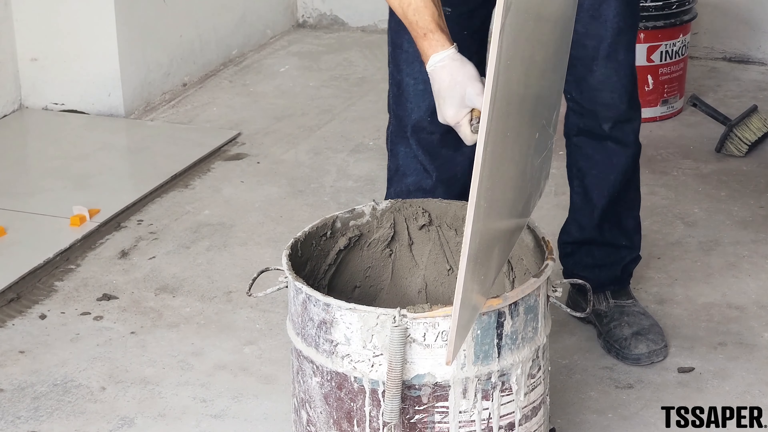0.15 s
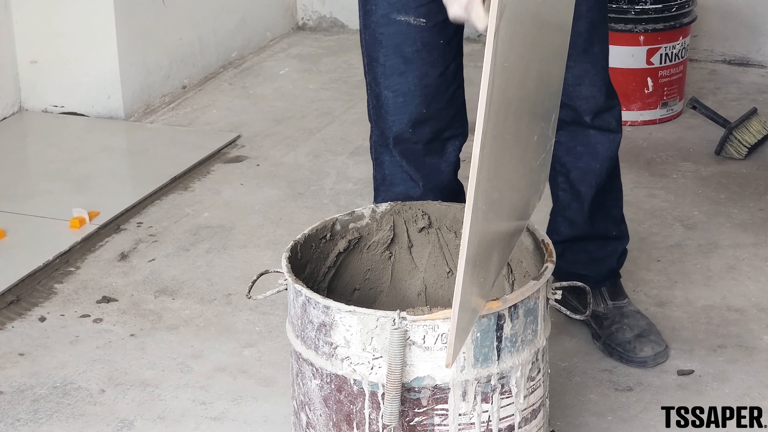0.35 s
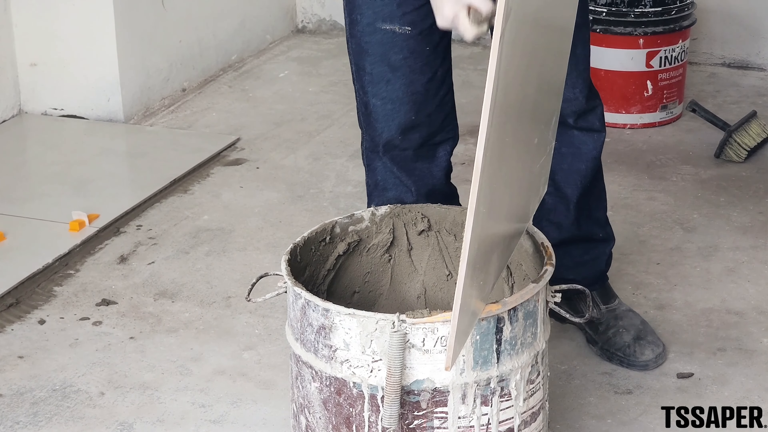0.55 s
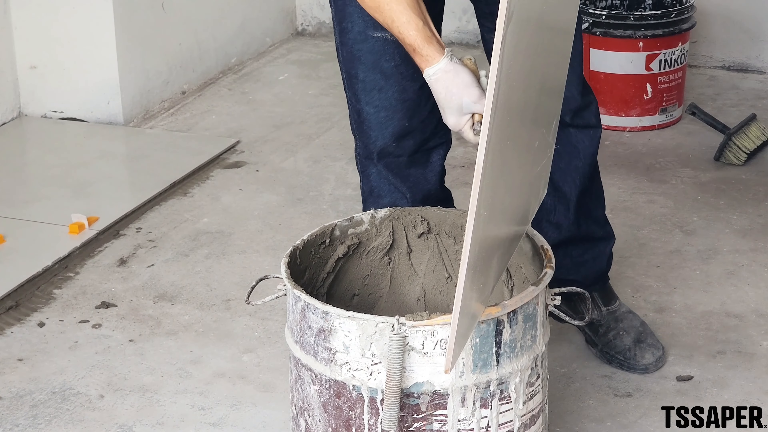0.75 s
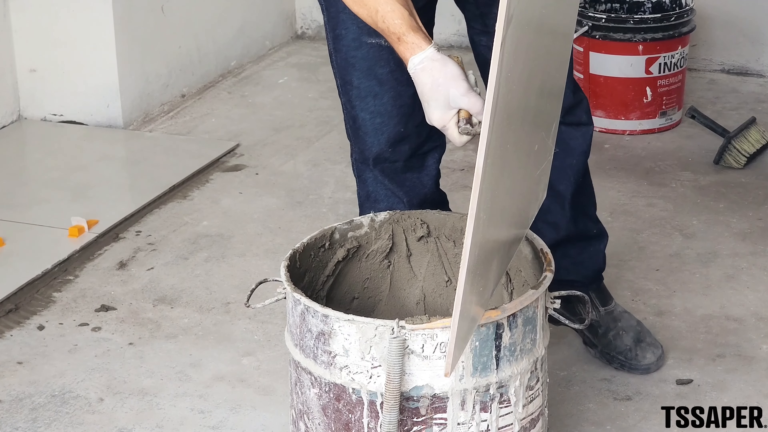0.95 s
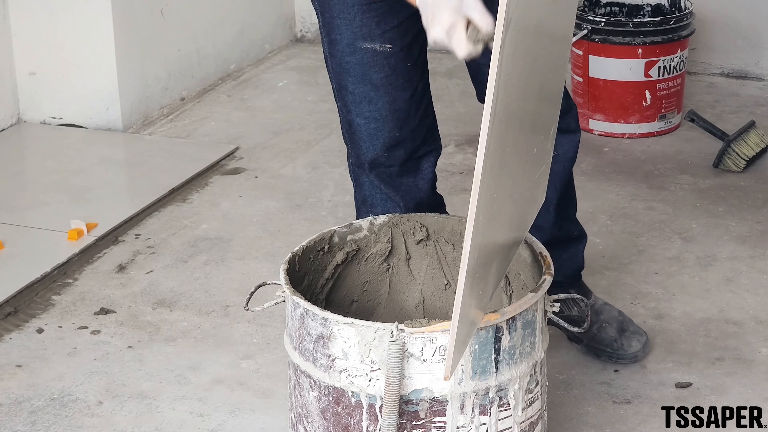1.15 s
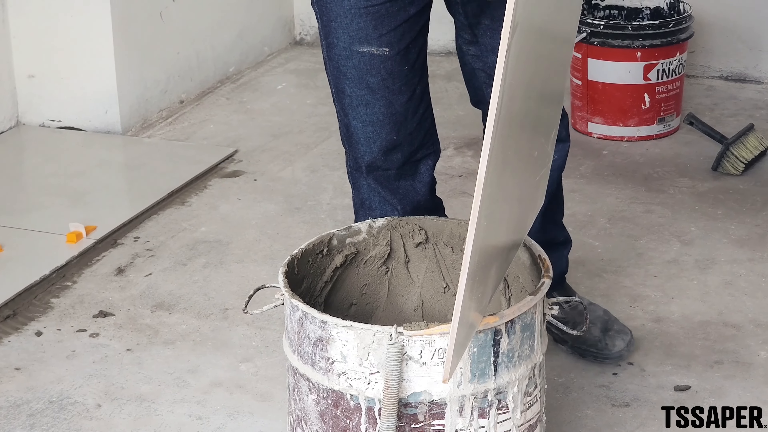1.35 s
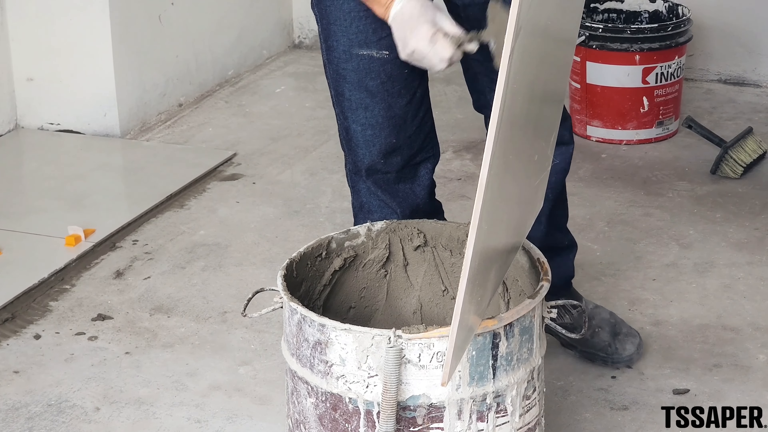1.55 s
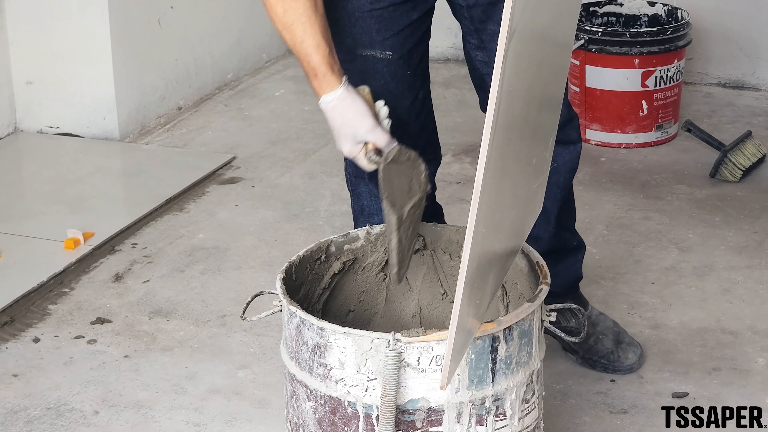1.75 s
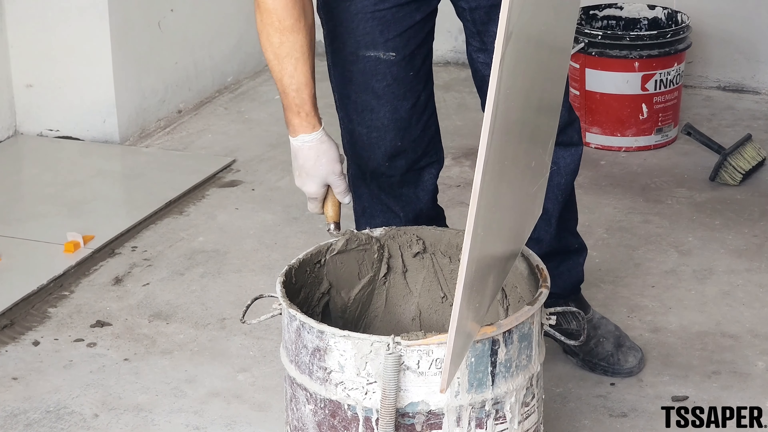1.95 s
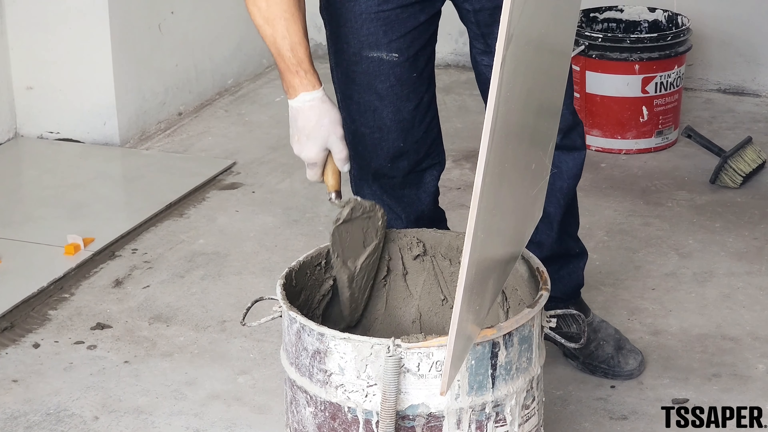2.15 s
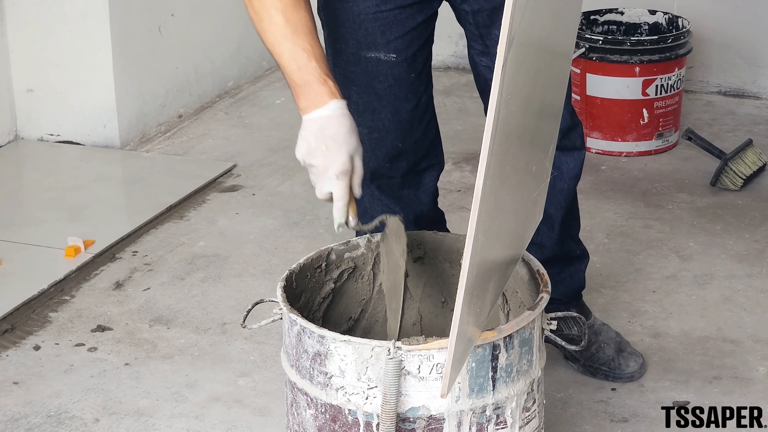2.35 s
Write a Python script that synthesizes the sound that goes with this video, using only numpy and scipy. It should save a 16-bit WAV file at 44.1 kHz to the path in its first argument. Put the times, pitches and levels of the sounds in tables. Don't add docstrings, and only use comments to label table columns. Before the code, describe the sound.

Short gritty trowel scrapes on a hard tile, then a knock on a hollow bucket and wet slide

```python
import sys
import numpy as np
from scipy import signal
from scipy.fft import rfft, irfft, next_fast_len
from scipy.io import wavfile
from scipy.ndimage import uniform_filter1d, map_coordinates

SR = 44100
rng = np.random.default_rng(int(sys.argv[2]) if len(sys.argv) > 2 else 0)


def invert_db(level):
    return 10 ** (np.asarray(level, dtype=float) / 20)


def transcribe(signal):
    frames = np.atleast_2d(signal).T
    limited = np.clip(frames, -1, 1)
    pcm = np.round(limited * 32767).astype(np.int16)
    wavfile.write(sys.argv[1], SR, pcm)


N = 105840

# time_s, pressure_db, ring_over_grit_db
STROKES = [
    [(.283, -60, 16), (.293, -50, 10), (.318, -38.5, 12.5), (.356, -36, 10.5), (.43, -41, 13.5),
     (.45, -36.5, 8.5), (.5, -37, 11.5), (.535, -55, 15), (.6, -60, -6)],
    [(.818, -46, 7), (.826, -39, 6), (.872, -44, 12), (.915, -49.5, 15.5), (.945, -38.5, 13),
     (.995, -40.5, 12), (1.035, -40, 12), (1.06, -52.5, 12.5), (1.2, -49.5, 12.5)],
    [(1.221, -74, 9), (1.225, -37, 10), (1.245, -48, 13), (1.29, -56.5, 16.5), (1.36, -64, 14)],
    [(1.378, -50, 10), (1.386, -37.5, 12.5), (1.4, -40, 12.5), (1.425, -37.5, 5.5), (1.47, -33.5, 7.5),
     (1.5, -42.5, 16), (1.56, -66, 10), (1.63, -71, -2)],
]
# start_s, peak_db, pitch_hz, t60_s
CATCHES = [(.291, -30, 1084, 0.012), (.3148, -18, 1850, .012), (.345, -10, 1800, .012),
           (.3557, -13.5, 1782, 0.057), (.362, -17, 2500, 0.016), (.3762, -6, 1740, 0.0096),
           (.389, -17, 1900, 0.027), (.402, -9, 1883, 0.025), (.41, -10, 1960, .015),
           (.4272, -8.5, 1670, 0.011), (.436, -23, 1840, .012), (.465, -14, 1800, .012),
           (.477, -20, 2160, 0.0077), (.5, -35, 2300, 0.017), (.5225, -12, 1500, 0.0041),
           (.531, -24, 1730, 0.0073), (.8383, -18.5, 1650, 0.022), (.8727, -8.5, 1830, 0.014),
           (.895, -35, 1790, 0.013), (.9535, -13, 2240, .014), (.96, -17, 3500, 0.01),
           (.969, -15, 2140, 0.0071), (.98, -23, 1840, 0.031), (.99, -12, 1830, 0.021),
           (.997, -22, 1770, 0.011), (1.003, -13, 1880, 0.019), (1.01, -19, 2300, 0.0073),
           (1.022, -12.5, 1600, 0.011), (1.039, -19, 1770, 0.0097), (1.055, -18, 1900, 0.0088),
           (1.07, -30, 1800, 0.01), (1.173, -15.5, 1736, 0.018), (1.198, -16, 1730, .015),
           (1.2245, -31, 4160, .008), (1.227, -11, 2860, 0.011), (1.229, -16.5, 3280, 0.011),
           (1.236, -23, 1353, 0.073), (1.2725, -24.5, 1550, 0.079), (1.3893, -9, 1690, .016),
           (1.3983, -10, 1677, .05), (1.4, -15.5, 2116, 0.046), (1.4257, -15, 1604, 0.031),
           (1.435, -9, 1800, .012), (1.455, -15, 1720, 0.016), (1.462, -11, 1740, 0.029),
           (1.471, -9.5, 2190, 0.01), (1.49, -15, 1800, 0.0097), (1.518, -14.5, 1900, 0.018),
           (1.567, -20, 1880, 0.012)]
# centre_hz, width_hz, level_db
TILE_MODES = [(212, 13, -10), (306, 36, -11), (650, 62, -10), (876, 35, 1.5), (1050, 60, -5),
              (1342, 60, 4.5), (1620, 44, 4), (1657, 57, 2.5), (1750, 105, 2), (1835, 72, 6.5),
              (1905, 34, -2), (1965, 36, 7.5), (2263, 280, -4.5), (2488, 81, 4)]
# freq_hz, level_db
TILE_BODY = [(200, -55), (450, -10.5), (650, -4), (1100, -6), (1800, 1.5), (2600, -3.5), (3600, -16),
             (6000, -49)]
# freq_hz, density_db_per_hz
GRIT = [(800, -43.5), (2000, -26.5), (3600, -9), (5500, -14), (7500, -15.5), (9500, -24), (12500, -19.5),
        (16000, -28.5)]
# start_s, peak_db
KNOCKS = [
    (1.9762, -21.5),
    (1.9773, -14),
]
# time_s, blade_db, boom_db
DRAG = [
    (1.973, -38, -58),
    (1.977, -41.5, -37),
    (2.0, -41.5, -36.5),
    (2.035, -41, -41),
    (2.055, -61, -38),
    (2.11, -64, -38),
    (2.13, -62, -47),
    (2.22, -80, -55),
    (2.3, -81, -70),
]
# start_s, peak_db, pitch_hz, t60_s
JOLTS = [
    (1.976, -25, 356, 0.067),
    (1.99, -24, 157, 0.091),
    (2.013, -27, 330, 0.13),
    (2.042, -26, 214, 0.081),
    (2.05, -26, 285, 0.091),
    (2.1, -22.5, 278, 0.099),
    (2.2, -32, 292, .08),
]
# time_s, level_db
SLIDE = [
    (2.175, -53),
    (2.2, -44.5),
    (2.25, -50),
    (2.32, -46.5),
    (2.4, -51),
]
# centre_hz, width_hz, level_db
BUCKET_MODES = [(151, 53, -1.5), (218, 65, -4), (285, 97, 5.5), (376, 110, -1.5), (642, 85, -10.5)]
# centre_hz, width_hz, level_db
BLADE_MODES = [(790, 830, -0.5), (1440, 340, -1), (2300, 670, 4), (2950, 540, 1.5), (3900, 440, -15),
               (4850, 370, 1.5), (5430, 520, 3), (6500, 400, -9), (7540, 780, -5.5), (8800, 600, -14),
               (11600, 1900, -5.5)]
# centre_hz, width_hz, level_db
MORTAR_MODES = [(1300, 190, -2), (2000, 750, 0.5), (4540, 610, 2.5), (6300, 3000, -19.5),
                (9900, 2600, -11.5)]
# centre_hz, width_hz, level_db
EARLIER_MODES = [(686, 54, -8.5), (1360, 90, -5), (1620, 77, -9), (1710, 31, -4), (1844, 40, 2.5),
                 (1980, 120, -4.5), (2500, 200, -11.5)]
# freq_hz, t60_s
ROOM_T60 = [(200, 0.93), (800, 0.82), (2000, 0.64), (5000, 0.55), (10000, 0.45), (15000, 0.24)]
# time_s, low_hum_db, upper_hum_db
HUM = [(0.0, -38.5, -41), (0.31, -49, -37.5), (0.37, -43, -31), (0.45, -35.5, -39), (0.75, -43, -48),
       (0.93, -79, -39.5), (1.0, -63, -38.5), (1.27, -46.5, -55), (1.47, -62, -42.5), (1.57, -65, -46),
       (1.86, -50, -38), (2.14, -69, -53), (2.29, -64, -43), (2.4, -53, -67)]
# freq_hz, density_db_per_hz
MURMUR = [(90, -4.5), (130, -2.5), (220, -9.5), (450, -17.5), (1100, -26), (1900, -24), (7000, -38.5),
          (13000, -55)]
# freq_hz, likeness_0_to_1
ALIKE = [(60, 1), (200, 0.93), (380, 0.75), (700, 0.1), (1300, 0.016), (5000, 0.011)]
# freq_hz, left_over_right_db
LEFT_OVER_RIGHT = [(60, 1), (130, -2), (290, 0), (640, 1), (1410, -7), (3100, -6.5), (6820, -1.5),
                   (15000, -5)]
# freq_hz, side_db
NARROW = [(5500, 0), (7500, -7.5), (11000, -8), (15000, -14)]


def unit(x):
    return x / np.sqrt(np.mean(x ** 2) + 1e-20)


def along(points, hz):
    f, v = np.transpose(points)
    return np.interp(np.log(hz + 1), np.log(f + 1), v)


def curves(rows, outside=-120):
    s, *cols = np.transpose(rows)
    return [np.interp(np.arange(N) / SR, s, c, outside, outside) for c in cols]


def wobble(rate_hz):
    knots = rng.standard_normal(int(N * rate_hz / SR) + 4)
    return map_coordinates(knots, [np.arange(N) * rate_hz / SR])


def filtered(x, response):
    m = next_fast_len(N + SR // 2)
    return irfft(rfft(x, m) * response(np.fft.rfftfreq(m, 1 / SR)), m)[..., :N]


def modes(peaks):
    def response(f):
        total = 0
        for k, (c, w, db) in enumerate(peaks):
            total = total + (-1) ** k * invert_db(db) * 1j * f * w / (c * c - f * f + 1j * f * w)
        return total
    return response


def blend(peaks):
    return lambda f: np.sqrt(sum(np.abs(modes([peak])(f)) ** 2 for peak in peaks))


def colour(points):
    return lambda hz: invert_db(along(points, hz))


def pair(a, b):
    def turn(hz):
        angle = np.arccos(np.clip(along(ALIKE, hz), -1, 1)) / 2
        return np.array([np.cos(angle), np.sin(angle)])
    mid, side = filtered(np.array([a, b]), turn)
    return np.array([mid + side, mid - side])


def slips(slips_per_s, hiss_share):
    spread_db, clump_db = 3, 2.5
    happens = rng.random(N) < slips_per_s / SR
    size = np.minimum(rng.exponential(size=N), 3)
    grains = happens * np.sign(rng.standard_normal(N)) * invert_db(spread_db * size)
    hiss = rng.standard_normal(N)
    mix = np.sqrt(1 - hiss_share) * unit(grains) + np.sqrt(hiss_share) * hiss
    return unit(invert_db(clump_db * wobble(69.59)) * mix)


def patchy(x, depth_db):
    z = signal.stft(x, nperseg=256)[2]
    field = uniform_filter1d(rng.standard_normal(z.shape), size=5, axis=0)
    field = uniform_filter1d(field, size=8, axis=1)
    return signal.istft(z * invert_db(depth_db * unit(field)), nperseg=256)[1][:N]


def pings(rows, rise_s, grit):
    t, noise = np.arange(N) / SR, grit * rng.standard_normal(N)
    total = np.zeros(N)
    for start_s, db, hz, t60_s in rows:
        age = np.maximum(t - start_s, 0)
        envelope = invert_db(db - 60 * age / t60_s) * (1 - np.exp(-age / rise_s))
        total += envelope * (np.sin(2 * np.pi * hz * age) + noise)
    return total


def tile():
    body_db, body_at_db, body_growth = -4.5, -39.5, 0.17
    force = slips(slips_per_s=2100, hiss_share=0.37)
    press = sum(invert_db(curves(rows)[0]) for rows in STROKES)
    rung = sum(invert_db(np.sum(curves(rows), axis=0)) for rows in STROKES)

    treble = filtered(force, lambda hz: colour(GRIT)(hz) * (hz > 7000))
    grit = patchy(filtered(force * press, colour(GRIT)), depth_db=3.5) / np.sqrt(np.mean(treble ** 2))

    ring = filtered(force * rung, modes(TILE_MODES)) / np.std(filtered(force, modes(TILE_MODES)))
    swell = invert_db(body_db) * (press / invert_db(body_at_db)) ** body_growth
    body = filtered(force * rung * swell, colour(TILE_BODY)) / np.std(filtered(force, colour(TILE_BODY)))
    return grit + ring + body + pings(CATCHES, rise_s=0.00064, grit=0.038)


def bucket():
    crack_t60_s, thump_db = 0.009, 25.5
    t = np.arange(N) / SR
    cracks, blows = np.zeros(N), np.zeros(N)
    for start_s, db in KNOCKS:
        cracks += invert_db(db - 2.5 - 60 * np.abs(t - start_s) / crack_t60_s) * (t >= start_s)
        blows[round(start_s * SR)] = invert_db(db + thump_db)
    thump = filtered(blows, modes(BUCKET_MODES))

    blade_db, boom_db = curves(DRAG)
    rattle = unit(filtered(slips(slips_per_s=1500, hiss_share=0.82), blend(BLADE_MODES)))
    blade = (invert_db(blade_db) + cracks) * rattle

    force = slips(slips_per_s=270, hiss_share=0.8)
    boom = filtered(force * invert_db(boom_db), modes(BUCKET_MODES)) / np.std(filtered(force, modes(BUCKET_MODES)))
    return blade + boom + thump


def mortar():
    sink_ratio = 0.94
    wet = slips(slips_per_s=3500, hiss_share=0.85)
    shallow = unit(filtered(wet, blend(MORTAR_MODES)))
    deep = unit(filtered(wet, lambda hz: blend(MORTAR_MODES)(hz / sink_ratio)))
    depth = np.interp(np.arange(N) / SR, [SLIDE[0][0], SLIDE[-1][0]], [0, np.pi / 2])
    return invert_db(curves(SLIDE)[0]) * (np.cos(depth) * shallow + np.sin(depth) * deep)


def earlier():
    ring_db, ring_t60_s, grit_db, grit_t60_s, dull_hz = -45, 0.99, -50, 0.52, 4200
    t = np.arange(N) / SR
    ring = unit(filtered(pair(*rng.standard_normal((2, N))), modes(EARLIER_MODES)))
    grit = unit(filtered(pair(*rng.standard_normal((2, N))),
                         lambda hz: colour(GRIT)(hz) / (1 + (hz / dull_hz) ** 2)))
    return invert_db(ring_db - 60 * t / ring_t60_s) * ring + invert_db(grit_db - 60 * t / grit_t60_s) * grit


def room(x):
    first_wall_s, step = 0.004, SR // 8
    wet = np.zeros((2, N + 2 * SR))
    for at in range(0, N, step):
        hz, t, z = signal.stft(rng.standard_normal((2, SR)), SR, nperseg=256)
        t60_s = np.abs(along(ROOM_T60, hz))[:, None] + 0.01
        fading = z * invert_db(-60 * t / t60_s) / np.sqrt(t60_s)
        tail = signal.istft(fading, SR, nperseg=256)[1] * np.sqrt(14 / SR)
        part = signal.fftconvolve(x[None, at:at + step], tail, axes=1)
        start = at + round(first_wall_s * SR)
        wet[:, start:start + part.shape[1]] += part
    return pair(*wet[:, :N])


def site():
    hum = np.zeros(N)
    for db, hz, drift_hz in zip(curves(HUM, None), (37, 68.5), (2.3, 2.16)):
        phase = 2 * np.pi * np.cumsum(hz + drift_hz * wobble(7.4)) / SR
        hum += invert_db(db + 0.5 + wobble(15.0)) * np.sin(phase)
    murmur = unit(filtered(pair(*rng.standard_normal((2, N))), colour(MURMUR)))
    return hum + invert_db(-45.5 + 0.18 * wobble(7.6)) * murmur


def scene():
    left_lead_s, direct_db, room_db = 0.00011, -2.5, 0.5
    drum_room_db = -9
    work = tile() + bucket() + mortar()
    drum = pings(JOLTS, rise_s=0.004, grit=0)
    ears = np.array([[1], [-1]])
    direct = filtered(work + drum, lambda hz: np.exp(1j * np.pi * hz * left_lead_s * ears))
    answer = room(work + invert_db(drum_room_db) * drum)
    return invert_db(direct_db) * direct + invert_db(room_db) * answer + earlier() + site()


def top_cut(x):
    return signal.sosfilt(signal.butter(12, 15980, fs=SR, output="sos"), x)


def record(dry):
    top_hz, halves = 15980, np.array([[0.5], [-0.5]])
    left, right = filtered(dry, lambda hz: invert_db(along(LEFT_OVER_RIGHT, hz) * halves) * (hz < top_hz))
    mid = (left + right) / 2
    side = filtered((left - right) / 2, colour(NARROW))
    return top_cut(np.array([mid + side, mid - side]))


dry = scene()
out = record(dry)
transcribe(out)
```